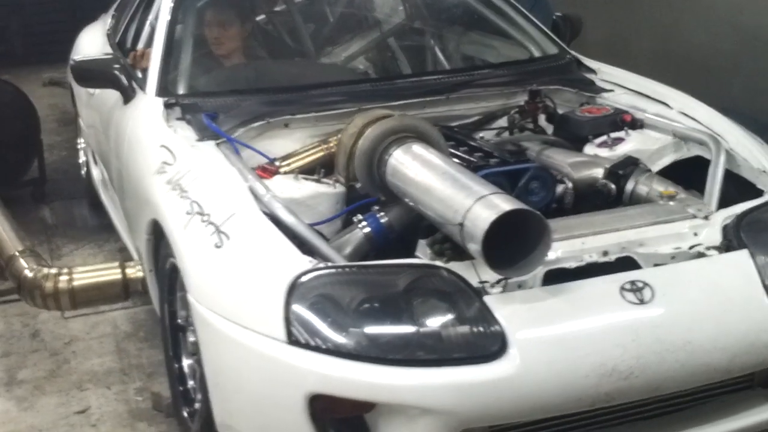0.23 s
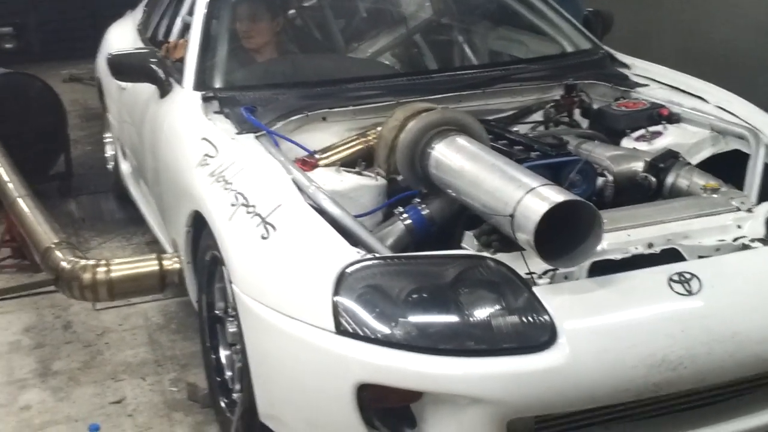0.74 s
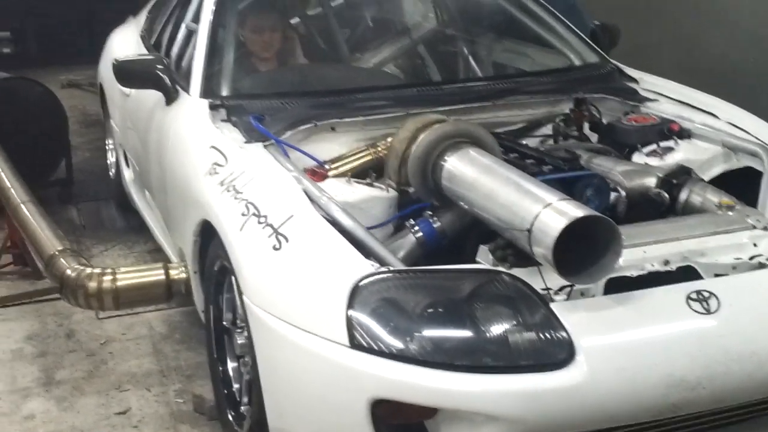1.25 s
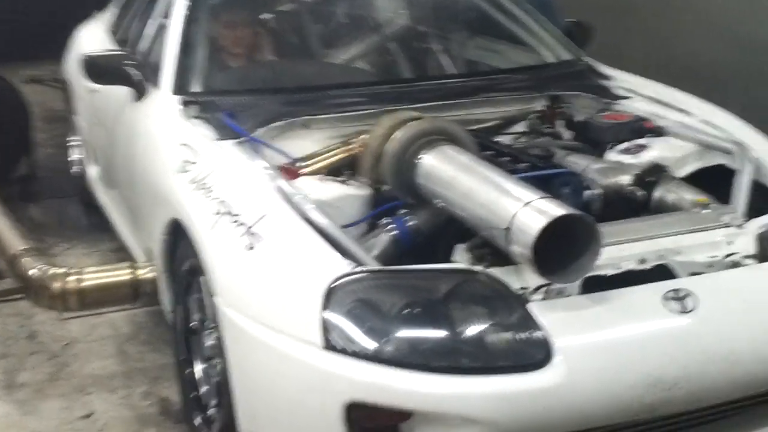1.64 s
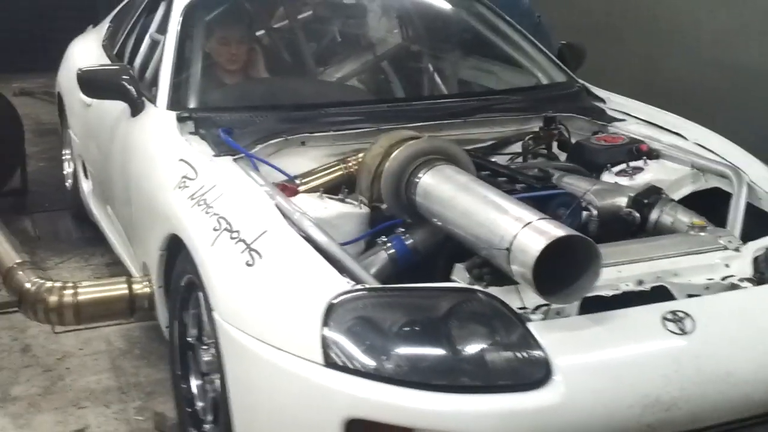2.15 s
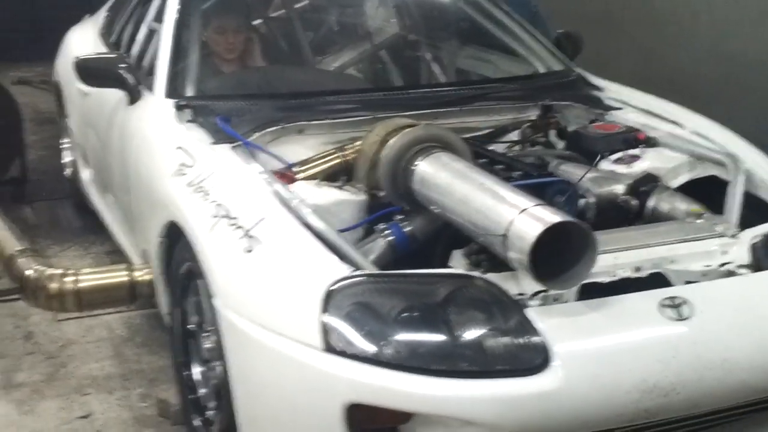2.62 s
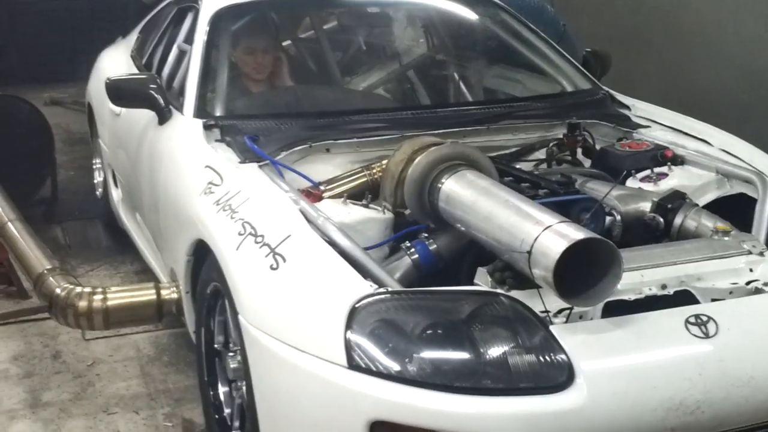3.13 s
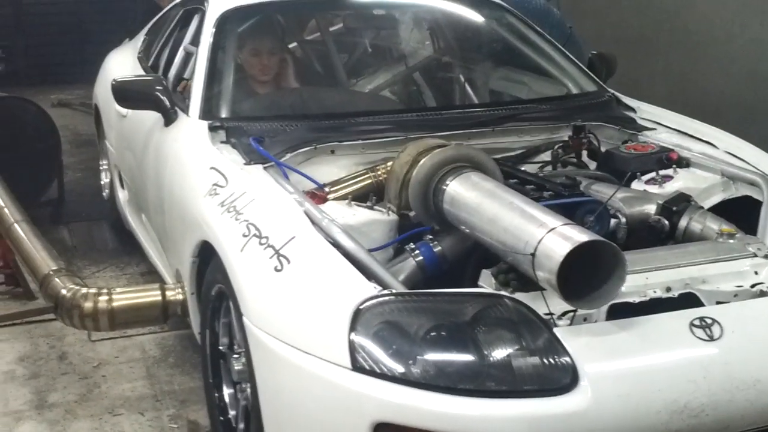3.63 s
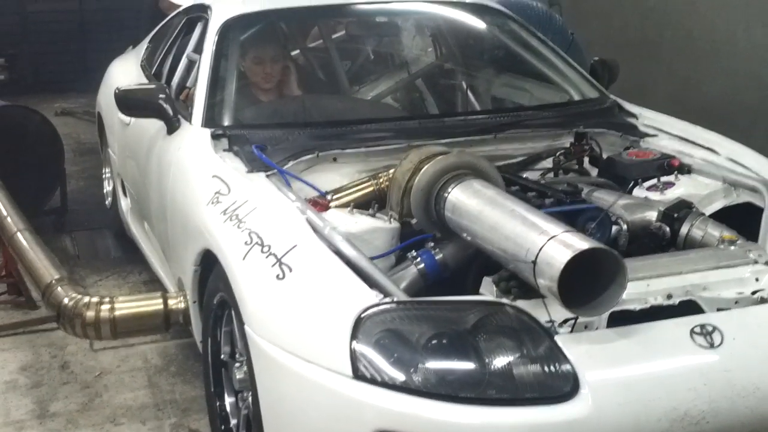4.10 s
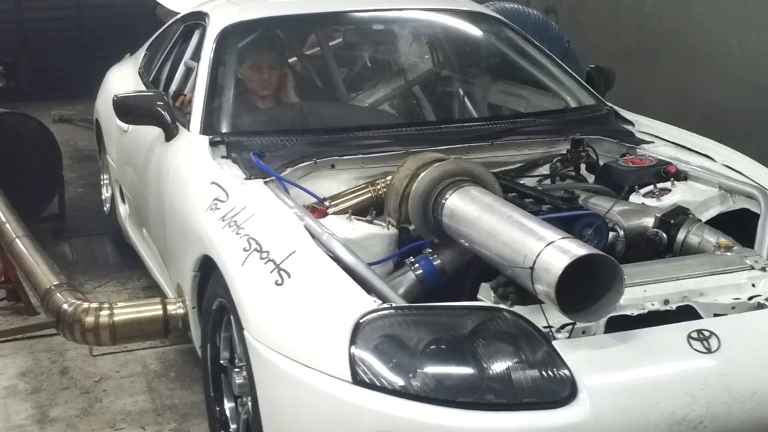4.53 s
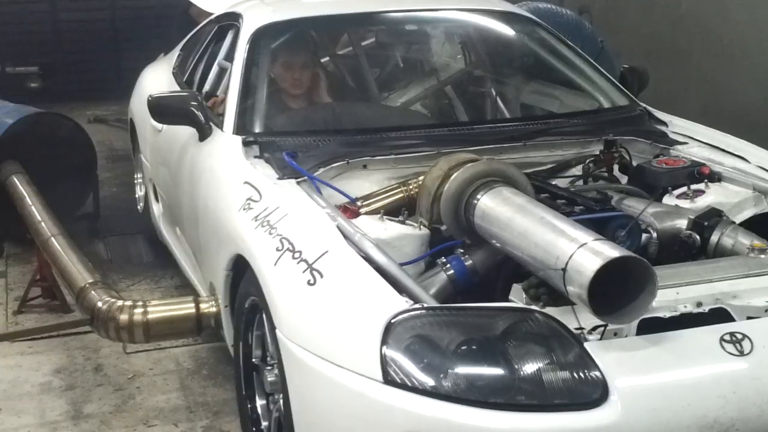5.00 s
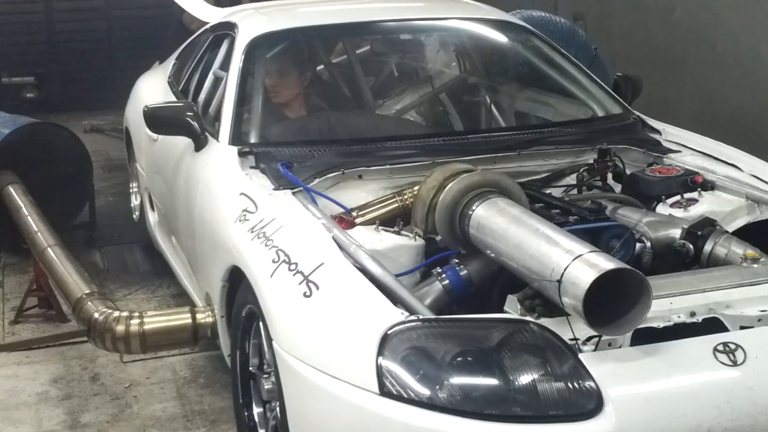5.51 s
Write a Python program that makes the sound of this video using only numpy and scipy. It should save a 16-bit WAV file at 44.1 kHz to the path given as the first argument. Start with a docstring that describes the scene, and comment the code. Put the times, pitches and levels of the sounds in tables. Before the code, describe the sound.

A turbocharged car runs under load in a hard indoor workshop. Intake hiss and engine roar form a dense, steady rush with a brief low drone and a few thumps at the start. The turbo whistle climbs for about three seconds, holds shrill and breathy, then stops at the throttle shut, giving four short falling chirps in gushing air. Close handheld stereo microphone, heavily overloaded.

```python
"""A turbocharger whistle climbs with boost and holds while an engine pulls on a dynamometer in a workshop.
The whistle is a pitch shaken by turbulence, with a hissy skirt and an octave. When the throttle shuts, the
compressor surges in short falling chirps while a band of noise gushes back out of the intake.
Shaped noise makes the intake hiss and engine roar; fuzzy partials of the firing rate make the drone.
The recorder's gain control overloads both microphone ports, so the loudest layer pushes the others down."""
import sys
import numpy as np
from scipy import signal
from scipy.fft import rfft, irfft, next_fast_len
from scipy.io import wavfile
from scipy.ndimage import uniform_filter1d, map_coordinates

SR = 44100
rng = np.random.default_rng(int(sys.argv[2]) if len(sys.argv) > 2 else 0)


def wav_out(sig):
    """Save sig, one row per channel (or a flat mono array), as 16-bit PCM at SR to the path in sys.argv[1]."""
    wavfile.write(sys.argv[1], SR, np.round(np.clip(np.atleast_2d(sig).T, -1, 1) * 32767).astype(np.int16))


N = 254016
SHUT_S = 5.07  # the throttle shuts


def amp(db):
    """Gain for a level in dB."""
    return 10 ** (np.asarray(db) / 20)


def unit(x):
    """Scaled to rms 1 along the last axis."""
    power = np.mean(np.abs(x) ** 2, axis=-1, keepdims=True)
    return x / np.sqrt(power + 1e-20)


def along(points, hz):
    """Values between (Hz, value) points, read on a log frequency axis."""
    point_hz, value = np.transpose(points)
    return np.interp(np.log(hz + 1), np.log(point_hz + 1), value)


def curves(rows):
    """One value per sample for each column after the time."""
    start_s, *columns = np.transpose(rows)
    return [np.interp(np.arange(N) / SR, start_s, column) for column in columns]


def ramp(start_s, length_s):
    """0 before the start, 1 after the length, straight between."""
    return np.clip((np.arange(N) / SR - start_s) / length_s, 0, 1)


def wobble(rate):
    """A smooth random curve with this many knots a second."""
    knots = rng.standard_normal(int(N * rate / SR) + 4)
    return map_coordinates(knots, [np.arange(N) * rate / SR])


def filtered(x, response):
    """Sound filtered by a gain that depends on frequency."""
    m = next_fast_len(N + SR // 4)
    spectrum = rfft(x, m) * response(np.fft.rfftfreq(m, 1 / SR))
    return irfft(spectrum, m)[..., :N]


def sides(pan_db):
    """Left and right gains for a left-minus-right level difference."""
    return amp([pan_db / 2, -pan_db / 2])


# Left-right likeness of the noise: pitch_hz, correlation (-1 to 1)
LIKENESS = [(60, 0.08), (180, -0.091), (530, -0.13), (1570, -0.02), (4660, -0.0042), (13800, -0.03)]


def rush(spectrum, patchy_db):
    """Turbulent stereo noise of rms 1, its gain varying in random patches of time and frequency."""
    z = signal.stft(rng.standard_normal((2, N)), nperseg=512)[2]
    patches = uniform_filter1d(rng.standard_normal(z.shape[1:]), 6, 0)
    patches = uniform_filter1d(patches, 10, 1)
    patchy = z * amp(patchy_db * patches / patches.std())
    pair = signal.istft(patchy, nperseg=512)[1][:, :N]

    def mid_side_response(hz):
        # the mid-to-side balance sets the left-right correlation
        angle = np.arccos(np.clip(along(LIKENESS, hz), -1, 1)) / 2
        return amp(along(spectrum, hz)) * [np.cos(angle), np.sin(angle)]

    mid, side = filtered(pair, mid_side_response)
    return unit(np.array([mid + side, mid - side]))


def fuzzy_tone(pitch_hz, width_hz, steady):
    """A tone whose size and phase are shaken by turbulence, differently at each port."""
    # eight noise steps per period of the width
    place = np.cumsum(np.maximum(width_hz, 5)) / SR * 8
    count = int(place[-1]) + 4
    smoothing = np.convolve([1, -.72], [1, -.35])
    shake = unit(signal.lfilter([1], smoothing, rng.standard_normal((4, count))))
    a, b, c, d = [map_coordinates(row, [place], order=1) for row in shake]
    sway = unit(steady + np.array([a + 1j * b, c + 1j * d]))
    carrier = np.exp(2j * np.pi * np.cumsum(pitch_hz) / SR)
    return np.sqrt(2) * np.real(sway * carrier)


# Compressor whistle: start_s, pitch_hz, level_db, reference_width_hz (each layer scales the width)
WHISTLE = [(0, 1900, -23, 200.6), (.45, 2380, -32, 170.2), (.75, 2786, -22, 99.79),
           (1.25, 3546, -18, 99.88), (1.7, 4456, -15.5, 110), (1.9, 4789, -20, 418.6),
           (2.1, 5420, -13.5, 380.9), (2.35, 6100, -15, 180.3), (2.65, 7280, -6.5, 320.2),
           (2.8, 7760, -6.5, 419.9), (2.95, 8310, -8, 450.5), (3.3, 8660, -8.5, 480.7),
           (3.7, 8910, -9.5, 379.8), (4.3, 9077, -9, 449.7), (4.9, 9110, -8.5, 400),
           (5.1, 8870, -13, 379.6)]
# Whistle balance: pitch_hz, left_minus_right_db
WHISTLE_PAN = [(2000, -7), (3000, 3), (4400, -10.5), (5300, -8), (6500, -2), (9000, -1.5)]
# the octave sets in, grows for one second at most, then falls back to its faint level
OCTAVE_FROM_S, OCTAVE_UNTIL_S, OCTAVE_SWELL_S = 1.87, 2.9, 0.055
OCTAVE_DB, OCTAVE_GROWS_DB_PER_S, OCTAVE_FAINT_DB = -20, 15.5, -35
# the skirt trails the whistle pitch and sits above it by a ratio
SKIRT_LAG_S, SKIRT_ABOVE, SKIRT_DB = .16, 1.018, -2.5
SKIRT_BASE_HZ, SKIRT_WIDER = 299.6, 1.6  # fixed part of its width, multiple of the reference width


def turbo():
    """Blade-pass whistle in a broad hissy skirt, and its octave; all fade out as the throttle shuts."""
    hz, level_db, width_hz = curves(WHISTLE)
    pan_db = along(WHISTLE_PAN, hz)
    octave_on = ramp(OCTAVE_FROM_S, OCTAVE_SWELL_S) - ramp(OCTAVE_UNTIL_S, OCTAVE_SWELL_S)
    octave_db = OCTAVE_DB + OCTAVE_GROWS_DB_PER_S * ramp(OCTAVE_FROM_S, 1)
    octave_gain = amp(OCTAVE_FAINT_DB) + octave_on * amp(octave_db)
    trailing_hz = np.interp(np.arange(N) - SKIRT_LAG_S * SR, np.arange(N), hz)
    hz = hz * (1 + .004 * wobble(9))
    core = amp(0.79 * wobble(16)) * fuzzy_tone(hz, .62 * width_hz, steady=0.08)
    skirt_width_hz = SKIRT_BASE_HZ + SKIRT_WIDER * width_hz
    skirt = amp(SKIRT_DB) * fuzzy_tone(SKIRT_ABOVE * trailing_hz, skirt_width_hz, steady=0)
    # the octave leans left
    octave = octave_gain * amp([[2.5], [-4]]) * fuzzy_tone(2 * hz, 2.8 * width_hz, steady=0)
    whistle = amp(level_db) * sides(pan_db) * (core + skirt)
    return (1 - ramp(SHUT_S, 0.093)) * (whistle + octave)


# Surge chirps: start_s, start_pitch_hz, end_pitch_hz, length_s, level_db, gush_choke_db
CHIRPS = [(5.165, 9000, 8200, .09, -17, -20), (5.325, 7750, 7350, .07, -15, -22),
          (5.42, 7600, 6500, .14, -21, -5), (5.59, 6200, 5350, .17, -17, -3)]
# Gush colour: pitch_hz, level_db (per Hz)
GUSH_COLOUR = [(2000, -30), (3600, -1), (4600, -1), (5100, 2.5), (5900, 1.5), (7500, -1), (9500, -1),
               (12000, 1), (15000, -4.5)]
GUSH_DB, GUSH_ATTACK_S = -13.5, 0.027
CHOKE_AT, CHOKE_S = 0.39, 0.014  # choke place as a fraction of the chirp, its width


def surge():
    """Each stall of the slowing wheel gives a short falling chirp and chokes the air that gushes out."""
    t = np.arange(N) / SR
    hz, chirp_gain = np.zeros(N), np.zeros(N)
    gush_db = np.full(N, float(GUSH_DB))
    for start_s, start_hz, end_hz, length_s, level_db, choke_db in CHIRPS:
        u = (t - start_s) / length_s
        inside = (u > 0) & (u < 1)
        hz += inside * (start_hz + (end_hz - start_hz) * u)
        chirp_gain += inside * amp(level_db) * np.sin(np.pi * u) ** 2
        gush_db += choke_db * np.exp(-((u - CHOKE_AT) * length_s / CHOKE_S) ** 2)
    gush = ramp(SHUT_S, GUSH_ATTACK_S) * amp(gush_db) * rush(GUSH_COLOUR, patchy_db=1.9)
    chirps = chirp_gain * fuzzy_tone(hz, np.full(N, 170.), steady=0.37)
    return chirps + gush


# Air and engine under load: start_s, hiss_db, roar_db, harsh_band_db, roar_left_minus_right_db
LOAD = [(0, -10, -18.5, -23, 2), (.3, -12, -19, -17, -1), (.9, -9, -18, -17, 0),
        (1.6, -7.5, -15.5, -22, 2.5), (2.4, -5, -15.5, -28, 2), (2.9, -6.5, -12, -31, 1.5),
        (3.4, -8.5, -15, -26, -2.5), (3.8, -8.5, -14, -29, -3), (4.3, -9.5, -16, -29, -1.5),
        (5.05, -9, -15.5, -33, -0.5)]
# Intake hiss colour: pitch_hz, level_db (per Hz)
HISS_COLOUR = [(100, -18), (250, -5.5), (500, -5.5), (1500, -6), (4000, 0.5), (9000, -2), (16000, -2.5)]
# Engine roar colour: pitch_hz, level_db (per Hz)
ROAR_COLOUR = [(100, -52), (200, -10), (350, -3), (800, 0), (1800, -3), (3000, -6), (6000, -25.5),
               (12000, -19)]
# Harsh band colour: pitch_hz, level_db (per Hz)
BARK_COLOUR = [(500, -44), (900, -3.5), (1400, 0), (2200, -2.5), (3200, -6), (5000, -40)]
LIFT_S, LIFT_HISS_DB, LIFT_ROAR_DB, LIFT_PAN_DB = 0.11, -3, -6, -4.5  # change once the throttle is shut


def air_and_engine():
    """Broad intake hiss over the lower roar of engine and rollers, both dropping at the shut, and a harsh band."""
    hiss_db, roar_db, bark_db, pan_db = curves(LOAD)
    lift = ramp(SHUT_S, LIFT_S)
    hiss_gain = amp(hiss_db + LIFT_HISS_DB * lift + 1.0 * wobble(6.5))
    hiss = hiss_gain * rush(HISS_COLOUR, patchy_db=0.9)
    roar_gain = amp(roar_db + LIFT_ROAR_DB * lift + 0.41 * wobble(9.1))
    roar = roar_gain * rush(ROAR_COLOUR, patchy_db=0.34)
    bark = amp(bark_db + 1.26 * wobble(4.1)) * rush(BARK_COLOUR, patchy_db=1.5)
    return hiss + sides(pan_db + LIFT_PAN_DB * lift) * (roar + bark)


# Drone partials: firing_rate_multiple, level_db, silent_from_s
PARTIALS = [(3, 0, 1.15), (10 / 3, 3, .26), (4, -7, 1.45), (6, -10, 1.45)]
FIRING_HZ, REV_HZ_PER_S = 100.8, 11.5  # firing rate at the start and its climb
DRONE_DB = -24.5


def exhaust():
    """A low drone that climbs with the revs and sinks under the roar; it reaches the ports in opposite phase."""
    firing_hz = FIRING_HZ + REV_HZ_PER_S * np.arange(N) / SR
    drone = 0
    for multiple, level_db, silent_s in PARTIALS:
        fade = 1 - ramp(silent_s - .12, .12)
        drone = drone + amp(level_db) * fade * fuzzy_tone(multiple * firing_hz, np.full(N, 6.), steady=4.2)
    opposite = amp([[1.3], [-1.3]]) * [[1], [-1]]
    return amp(DRONE_DB) * opposite * drone


# Low bumps at the left port: start_s (of the peak), level_db (peak)
BUMPS = [(0.114, -8), (0.134, -23), (0.259, -10), (0.42, -12), (0.449, -13), (0.472, -15), (0.579, -7),
         (0.847, -15), (0.914, -20)]


def thumps():
    """Single low pushes shaped as smooth one-sided pulses, mostly on the left."""
    t = np.arange(N) / SR
    width_s = .0014
    push = sum(amp(level_db) * np.exp(-((t - peak_s) / width_s) ** 2) for peak_s, level_db in BUMPS)
    return push * amp([[.1], [-30]])


def scene():
    """Whistle, surge, air and engine, and drone summed in stereo."""
    return turbo() + surge() + air_and_engine() + exhaust()


# Left port resonance: pitch_hz, level_db
LEFT_RESONANCE = [(300, 0.5), (2000, 0.5), (4500, 0), (6600, -5), (8000, 0), (10000, 3.5), (11800, 6),
                  (13000, 4.5), (14500, -1.5)]
# Right port resonance: pitch_hz, level_db
RIGHT_RESONANCE = [(300, 0), (2000, 2.5), (3500, 2), (4400, 3), (5000, 5.5), (5700, 1.5), (6800, -3.5),
                   (9000, -0.5), (14500, -1)]
TOP_HZ = 14520  # steep low-pass before the final clip, which adds some sound above it


def record(dry):
    """Each port has its own resonance; gain control holds the level so hot that peaks are squashed."""
    heard = filtered(dry, lambda hz: amp([along(LEFT_RESONANCE, hz), along(RIGHT_RESONANCE, hz)]))
    # each port is levelled by its own rms over 40 ms
    loudness = np.sqrt(np.abs(uniform_filter1d(heard ** 2, size=round(.04 * SR), axis=1)))
    held = amp(-4.5) * heard / loudness
    squashed = held / (1 + np.abs(held / .93) ** 5) ** (1 / 5)

    def bass_cut(hz):
        # steep cut below 250 Hz that leaves a little bass
        return (hz / 250) ** 5 / np.sqrt(1 + (hz / 250) ** 10) + 0.16

    # the thumps join after the gain control
    bumped = filtered(squashed, bass_cut) + thumps()
    low_passed = filtered(bumped, lambda hz: hz < TOP_HZ)
    return np.clip(low_passed, -1, 1)


dry = scene()
out = record(dry)
wav_out(out)
```